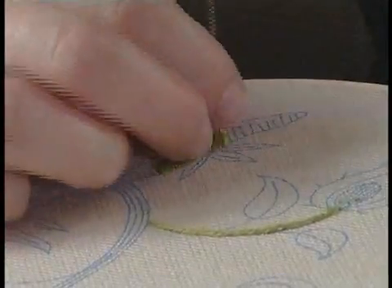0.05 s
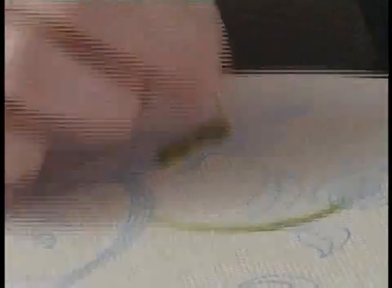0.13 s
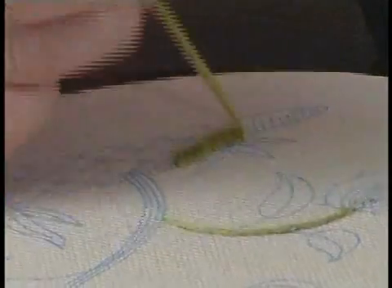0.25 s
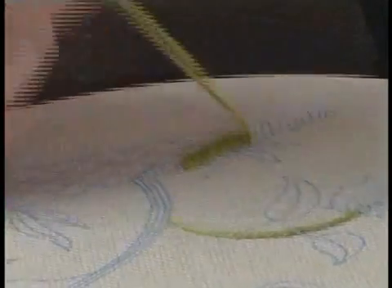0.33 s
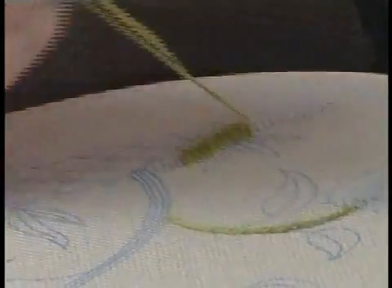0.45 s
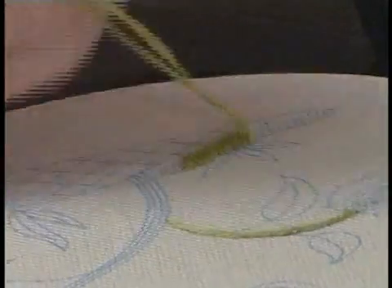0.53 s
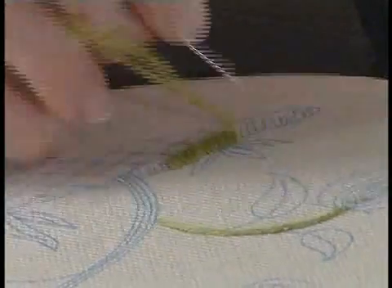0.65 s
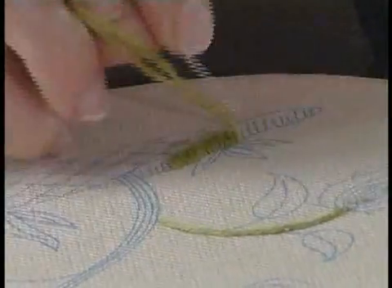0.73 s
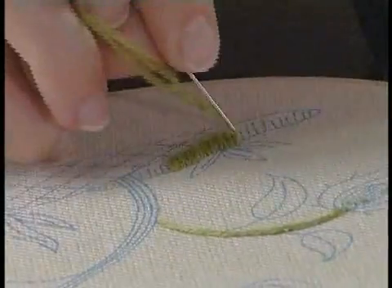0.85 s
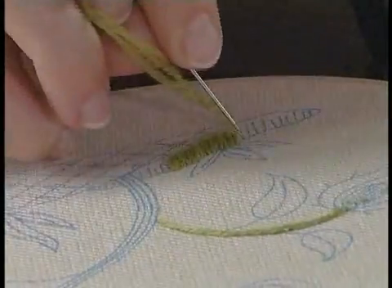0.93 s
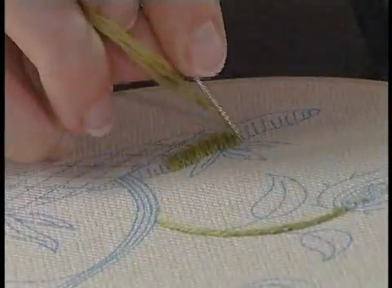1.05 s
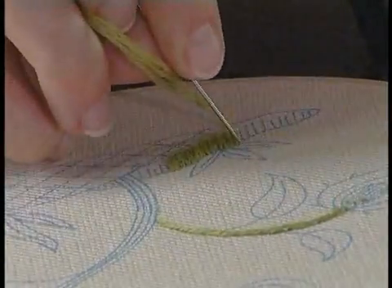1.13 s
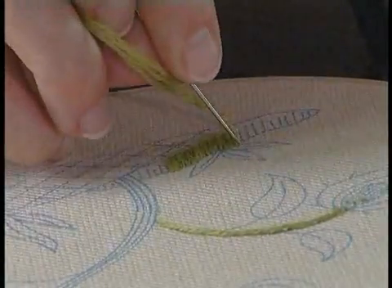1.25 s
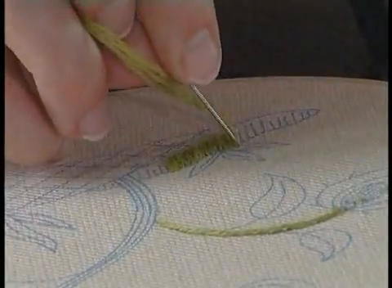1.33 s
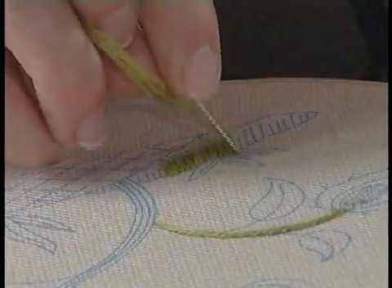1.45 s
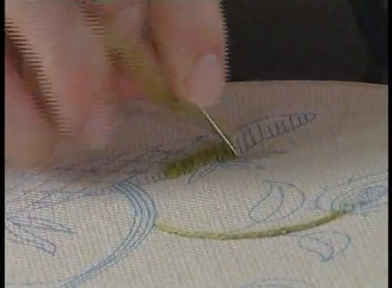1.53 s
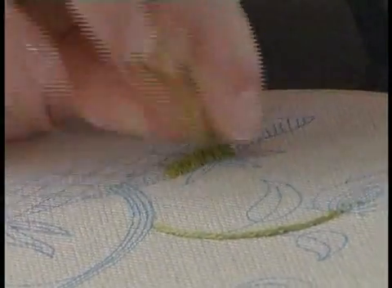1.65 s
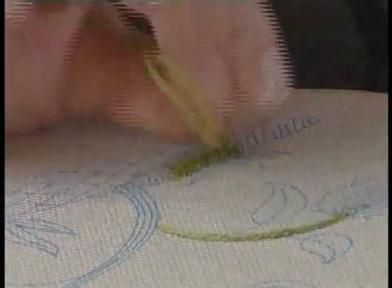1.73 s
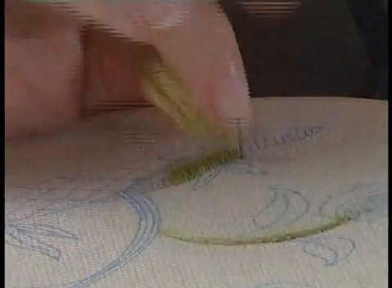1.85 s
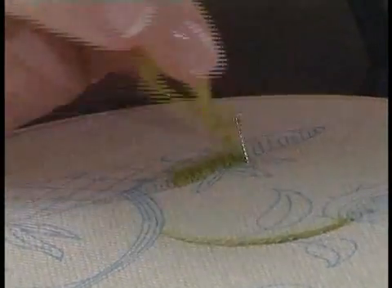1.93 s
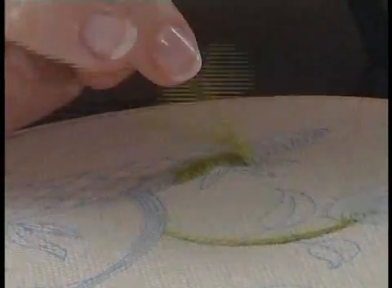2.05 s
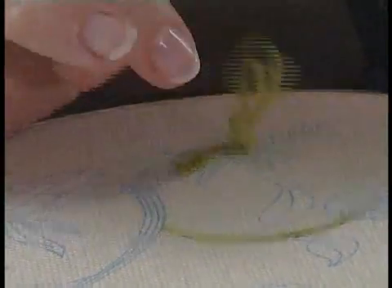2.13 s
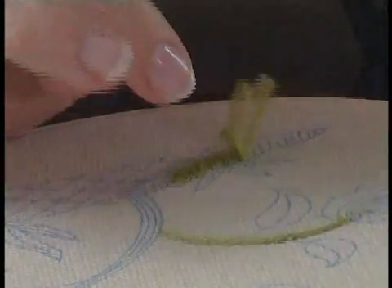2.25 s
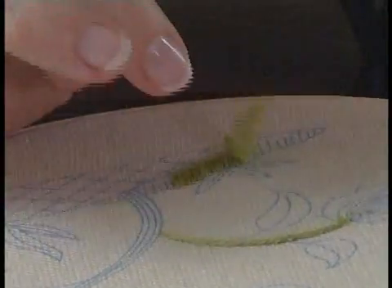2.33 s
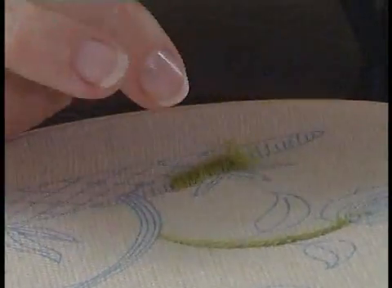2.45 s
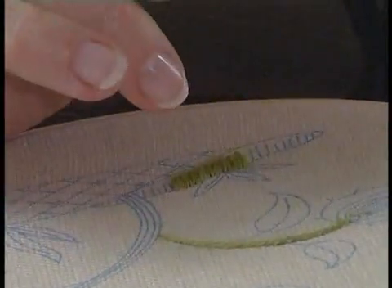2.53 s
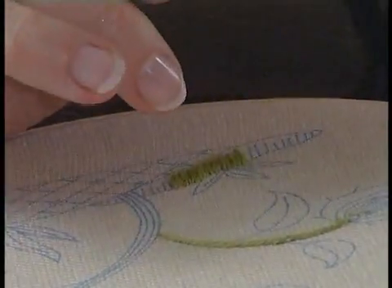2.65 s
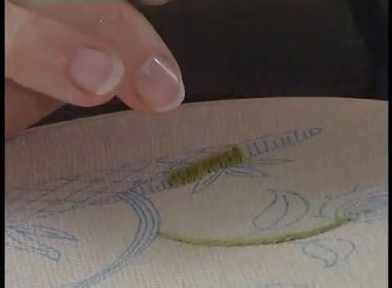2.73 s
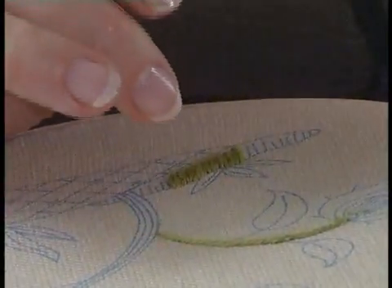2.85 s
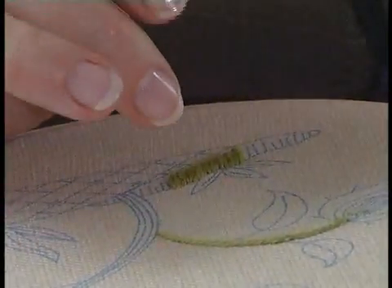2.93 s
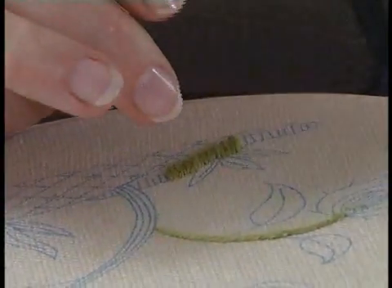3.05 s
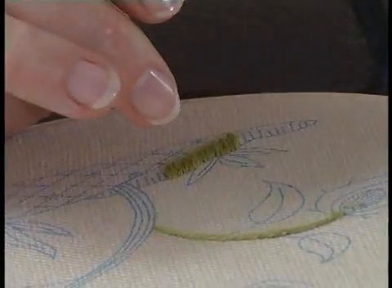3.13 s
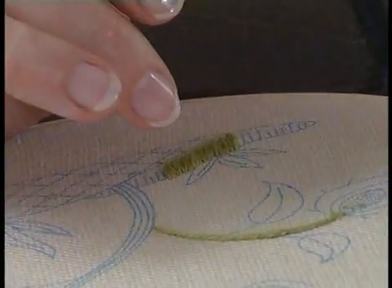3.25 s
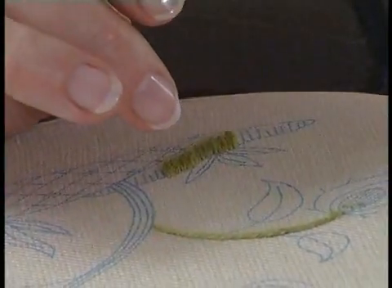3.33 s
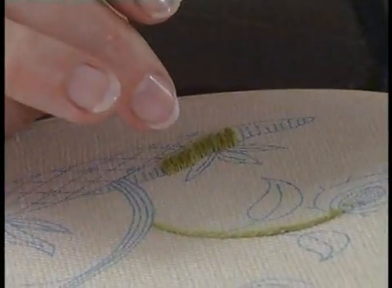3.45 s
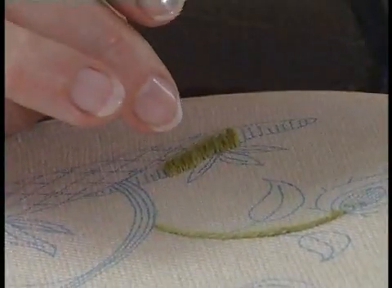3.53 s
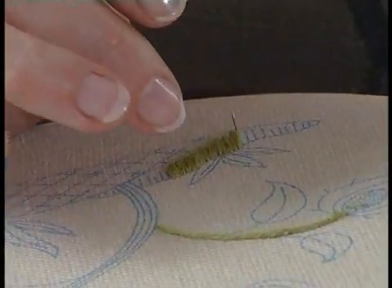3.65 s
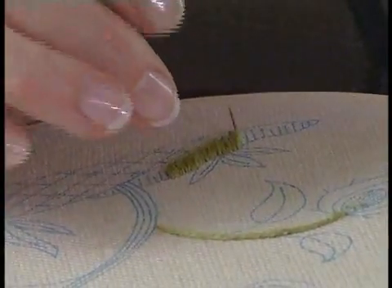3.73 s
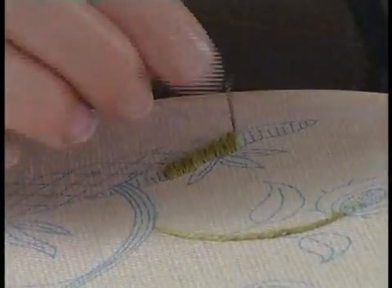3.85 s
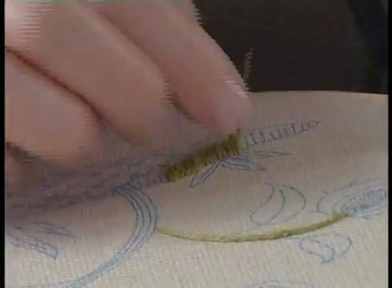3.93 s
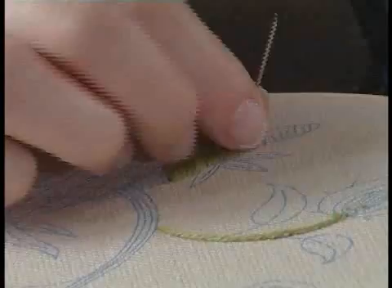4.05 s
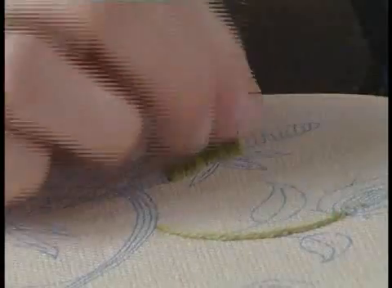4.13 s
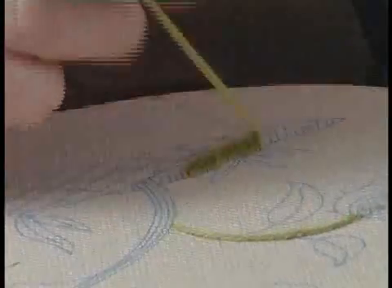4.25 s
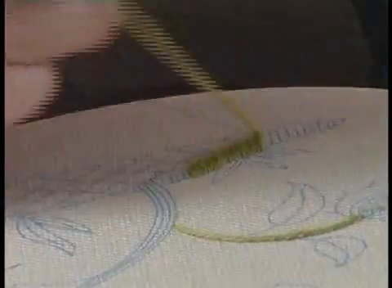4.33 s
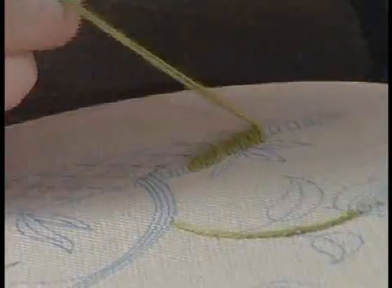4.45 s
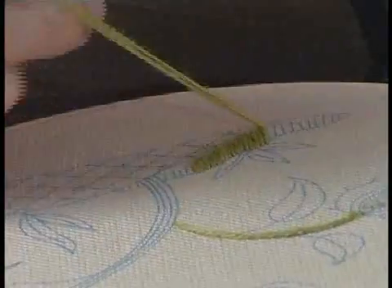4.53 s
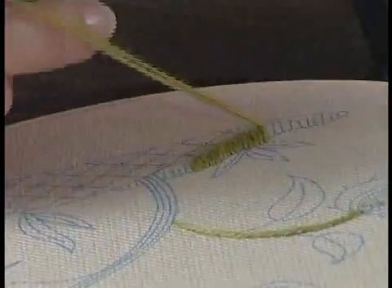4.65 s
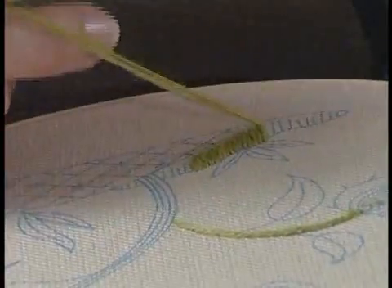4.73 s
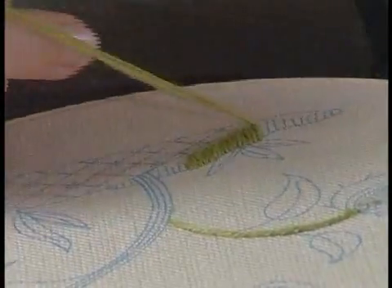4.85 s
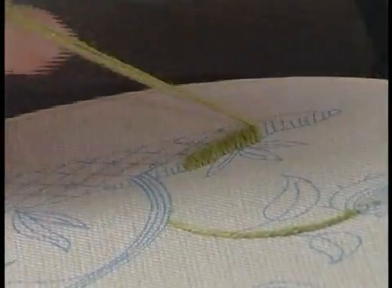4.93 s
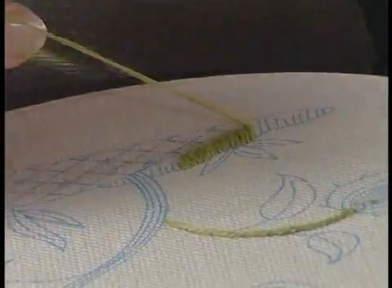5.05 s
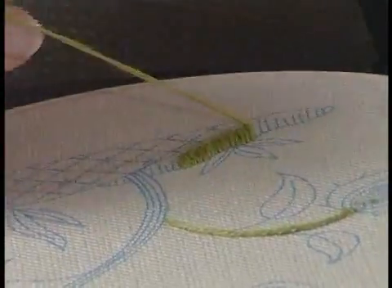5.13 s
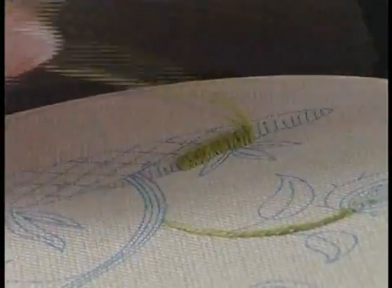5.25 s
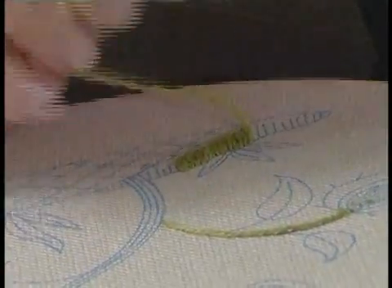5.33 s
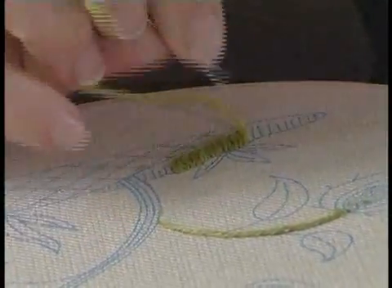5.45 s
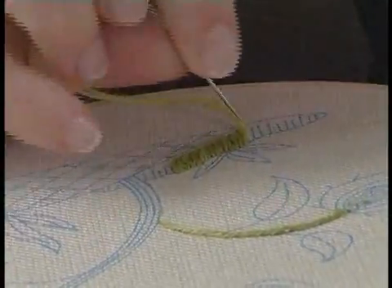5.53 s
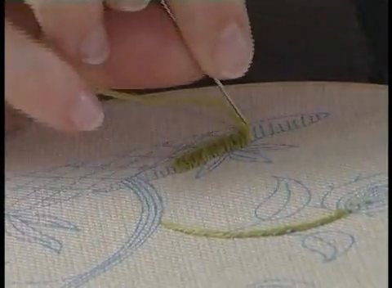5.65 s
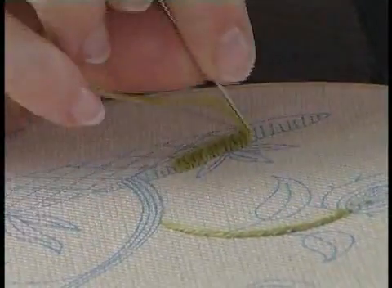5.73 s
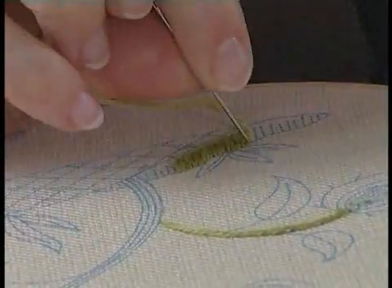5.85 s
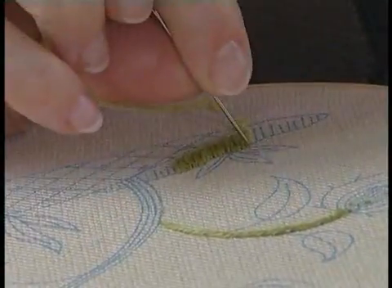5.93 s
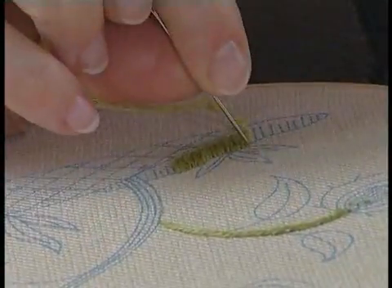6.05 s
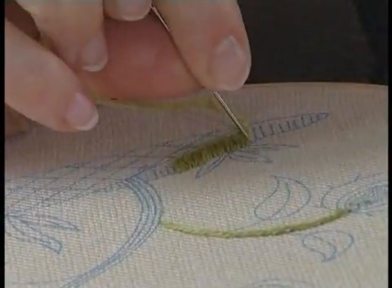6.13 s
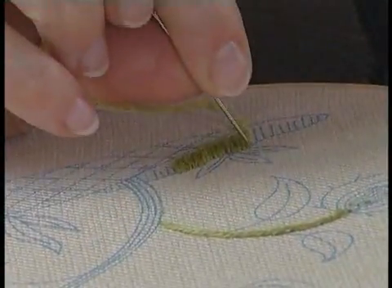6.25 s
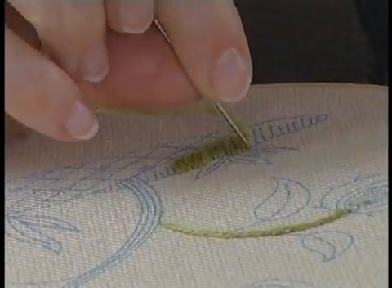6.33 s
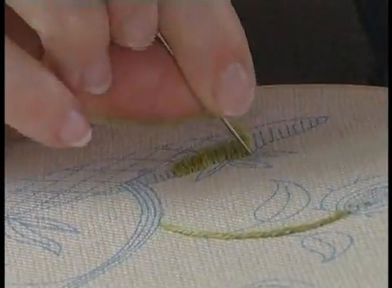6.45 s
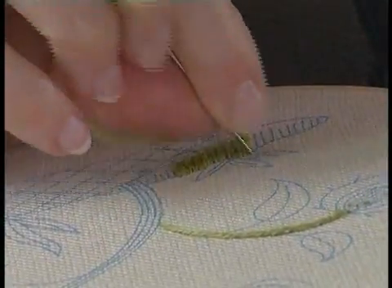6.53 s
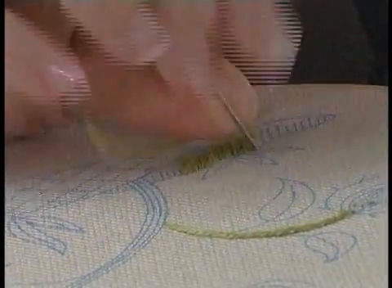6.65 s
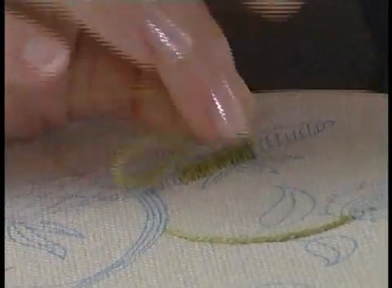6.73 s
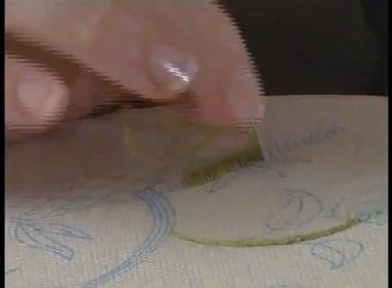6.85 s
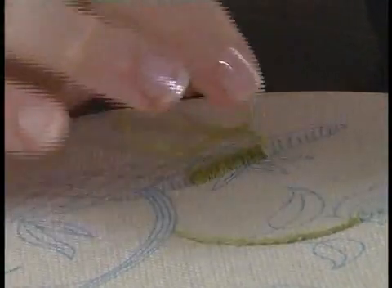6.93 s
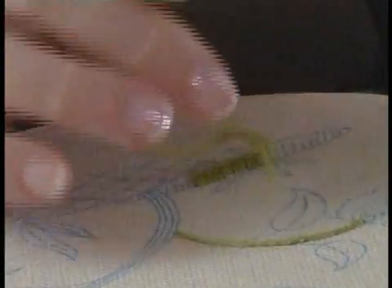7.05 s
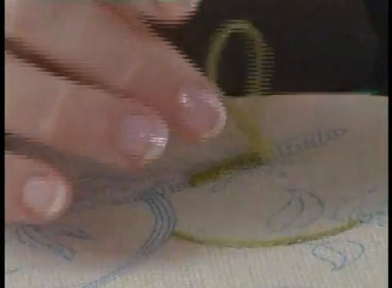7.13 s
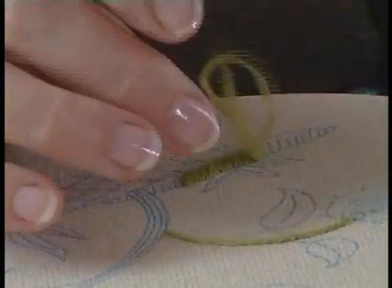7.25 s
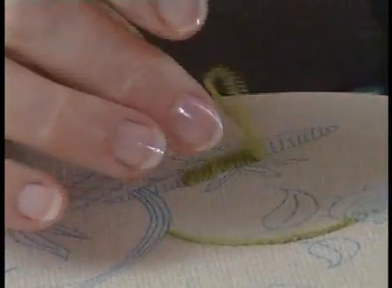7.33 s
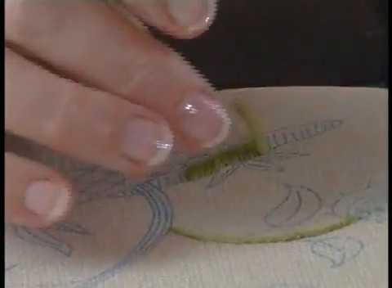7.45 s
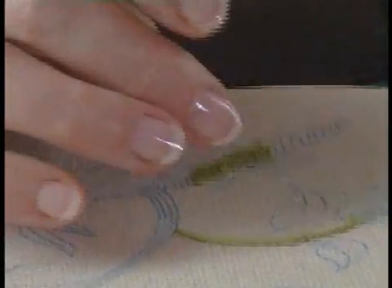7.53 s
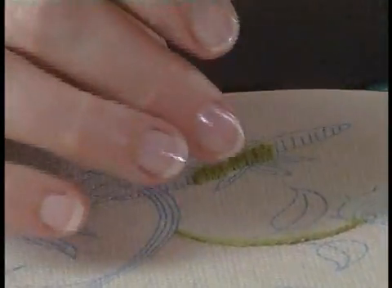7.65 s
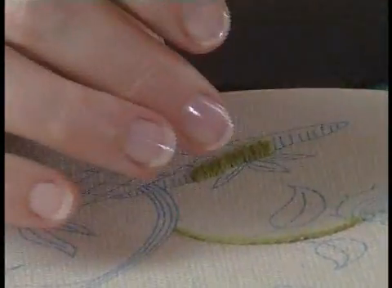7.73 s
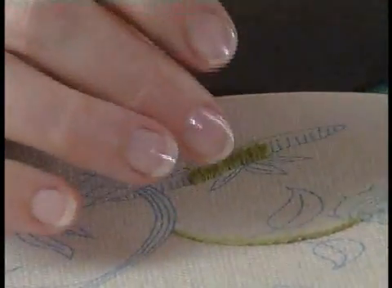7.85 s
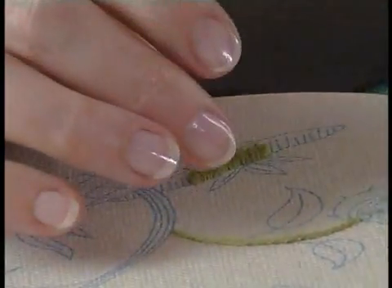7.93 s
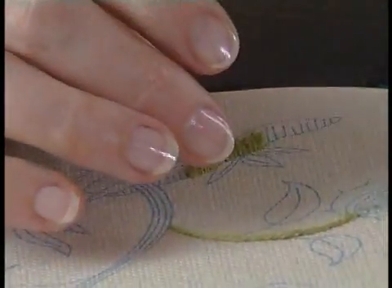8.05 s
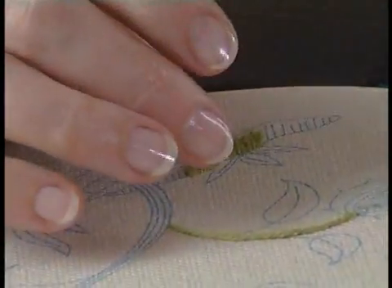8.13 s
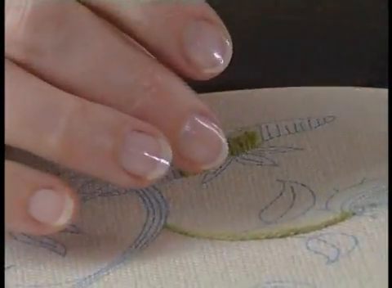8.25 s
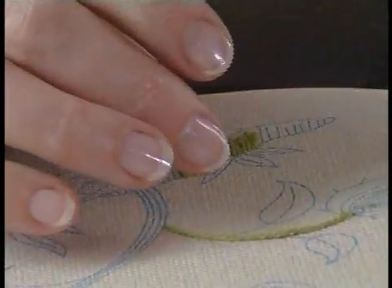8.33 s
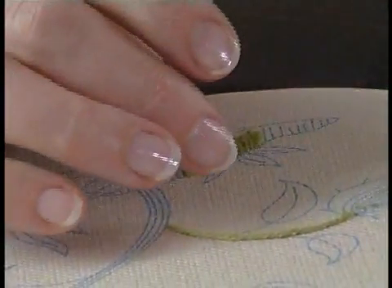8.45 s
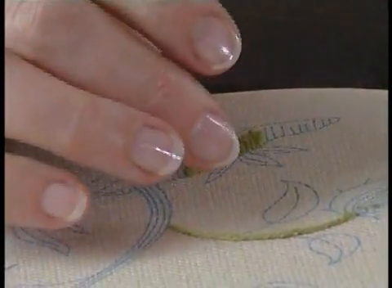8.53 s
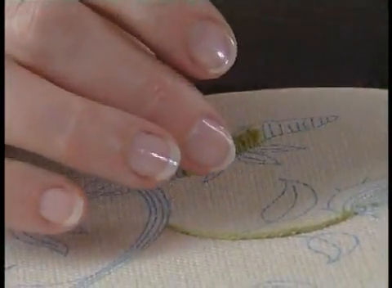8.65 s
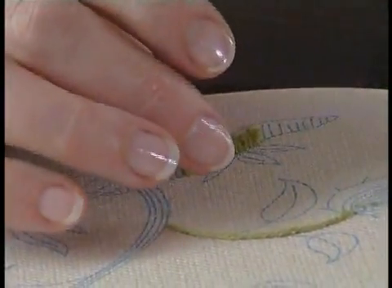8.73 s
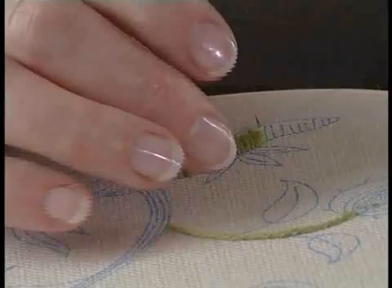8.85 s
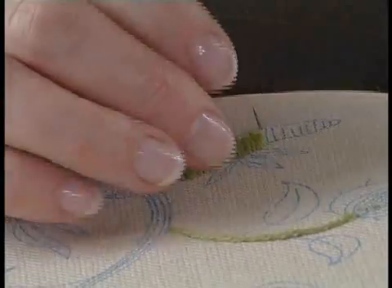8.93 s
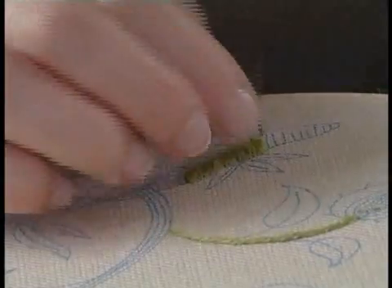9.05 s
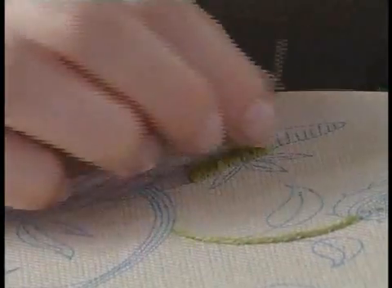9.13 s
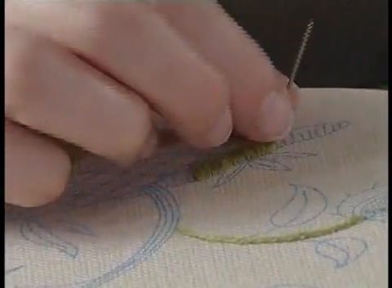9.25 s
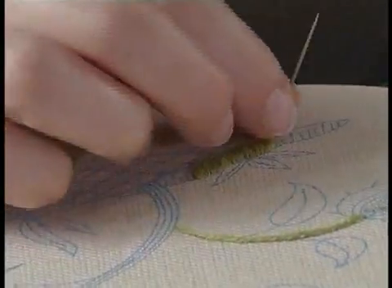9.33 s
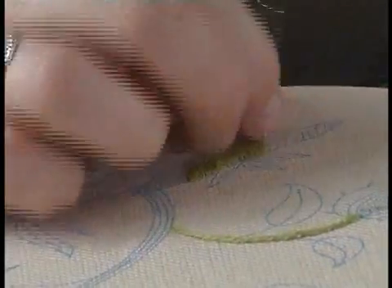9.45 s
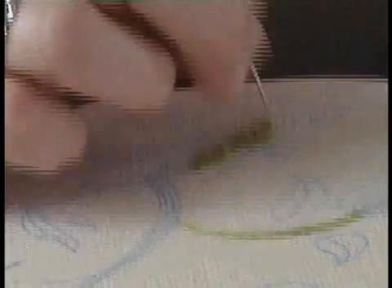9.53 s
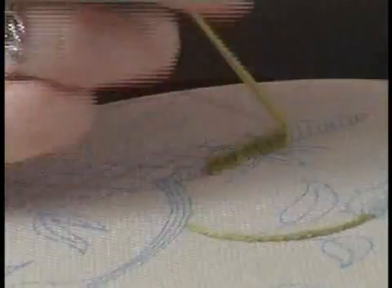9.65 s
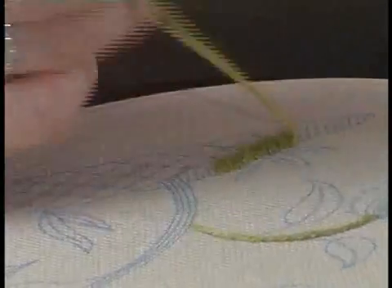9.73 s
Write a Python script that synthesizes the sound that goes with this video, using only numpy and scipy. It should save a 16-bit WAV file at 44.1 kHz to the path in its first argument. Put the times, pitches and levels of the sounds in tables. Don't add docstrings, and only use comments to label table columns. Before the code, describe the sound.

A small, dry, quiet room heard through two close microphones, with steady soft hiss and a low mains hum mostly on the right. At 0.25 s the needle's eye bursts up through taut cloth with the loudest hollow pop and a dull rasp; thread rumbles through until about 0.9 s. After a pause, a bright steel snap at 1.55 s starts light scuffs and pricks. A downward pop at 2.2 s is followed by dragging thread until 2.7 s, then sparse taps. Another upward pop at 4.29 s brings a brighter rasp and pulls, then a fluttering run of tightening jerks at 4.9-5.2 s. Quiet taps lead to finger rubbing at 6.7-7 s, a downward pop at 7.25 s and soft thread drag to 7.8 s. Faint ticks and brushing follow from 8.1 s, until a last upward pop at 9.66 s and short pull.

```python
import sys
import numpy as np
from scipy import signal
from scipy.fft import rfft, irfft, next_fast_len
from scipy.io import wavfile
from scipy.ndimage import map_coordinates

SR = 44100
rng = np.random.default_rng(int(sys.argv[2]) if len(sys.argv) > 2 else 0)


def to_wav(sig):
    pcm = np.clip(np.atleast_2d(sig), -1, 1) * 32767
    pcm = np.round(pcm).astype(np.int16)
    wavfile.write(sys.argv[1], SR, pcm.T)


def ratio_of_db(decibels):
    return 10 ** (np.asarray(decibels, float) / 20)


N = 431738

# (frequency [Hz], density [dB per Hz])
HISS_SPECTRUM = [(130, -24), (220, -6), (330, -1), (420, -4.5), (682, -5.5), (1900, -10.5), (13300, -14),
                 (15100, -20)]
# (frequency [Hz], difference [dB])
HISS_LEAN = [(60, 4), (110, -28), (200, -7), (370, -4.5), (690, -1.5), (1270, -3), (4310, -6),
             (14600, -4.5)]
# (frequency [Hz], density [dB per Hz])
FAR_RUMBLE = [(18, -20), (30, -2), (50, -1), (78, -8), (100, 8.5), (140, -1.5), (230, 2.5), (320, -38)]
# (frequency [Hz], left level [dB], right level [dB])
MAINS_HUM = [(50, -85, -87), (100, -97, -84), (150, -108.5, -63), (448, -94.5, -81.5), (1800, -84, -85.5)]
# (frequency [Hz], T60 [s])
ROOM_T60 = [(150, 0.2), (500, 0.13), (2000, 0.14), (8000, 0.061)]
NOISE_TOP_HZ = 14450

# (frequency [Hz], width [Hz], level [dB])
CLOTH_MODES = [(230.3, 62, -9.5), (315.4, 27, -2.5), (397, 59, -2), (551, 81, -8.5), (697, 29, -6.5),
               (783, 160, -17), (1173, 104, -12.5), (1269, 130, -18), (1540, 270, -18), (1980, 200, -17)]
# (frequency [Hz], width [Hz], level [dB])
HOOP_MODE = (144, 68, -13.5)
# (frequency [Hz], width [Hz], level [dB])
RUBBED_MODE = (383.4, 31, -2.5)
# (frequency [Hz], width [Hz], level [dB])
POINT_MODES = [(625, 183, 1.5), (1453, 142, 7), (2085, 680, -3.5)]
# (frequency [Hz], width [Hz], level [dB])
EYE_MODES = [(630, 100, 4.5), (1220, 400, 1.5), (1890, 590, -2)]
# (frequency [Hz], density [dB per Hz])
RUSTLE_SPECTRUM = [(470, -1), (800, -10), (1190, -6), (3100, -6.5), (5370, -9.5), (12800, -18),
                   (14300, -21), (15100, -51)]

# (start [s], length [s], rumble at start [dB], rumble at end [dB], rustle [dB])
RUBS = [(0.035, 0.017, -88, -76, -66), (0.156, 0.065, -76, -63.5, -72), (1.563, 0.071, -52.5, -72, -74),
        (1.633, 0.059, -58, -60, -68), (1.7, 0.095, -70, -73, -75), (1.806, 0.058, -73.5, -62, -65),
        (1.878, 0.056, -56, -62, -59.5), (1.96, 0.28, -64, -66.5, -69.5), (3.872, .38, -71.5, -75, -70.5),
        (4.269, 0.0093, -54, -54, -73), (4.765, .04, -84, -82, -72), (6.736, .06, -76, -73, -70),
        (6.804, 0.14, -62.5, -67, -62), (6.818, .05, -59, -57, -68), (6.987, 0.3, -65.5, -76.5, -68.5),
        (5.296, 0.38, -81, -82, -86), (8.5, 0.49, -84, -86, -92), (9.008, 0.293, -72.5, -84, -71.5),
        (9.075, 0.075, -73, -70, -73), (9.156, 0.18, -70, -72, -77), (9.576, 0.072, -69, -62, -67)]
# (start [s], length [s], rumble at start [dB], rumble at end [dB], rustle [dB])
PULLS = [(0.299, 0.094, -57, -48, -62), (.405, 0.0091, -67, -48.5, -52), (0.438, 0.058, -58, -59, -64),
         (0.514, .17, -64, -76, -73.5), (0.703, 0.16, -66, -76, -77), (2.25, 0.15, -47.5, -60.5, -67.5),
         (2.404, 0.17, -61.5, -50.5, -62.5), (2.588, 0.073, -62, -71, -84),
         (4.317, 0.12, -49.5, -51, -59.5), (4.463, 0.16, -54, -72, -79), (4.909, 0.209, -58, -56, -69),
         (5.142, .15, -57.5, -75, -83), (7.29, 0.13, -58.5, -56.5, -65), (7.434, 0.19, -59, -68, -65.5),
         (7.604, 0.033, -68, -57, -69), (7.652, 0.14, -67, -81, -79), (9.705, 0.097, -57, -54, -66.5)]
ATTACK_S, RELEASE_S = 0.014, 0.023
RUSTLE_FOLLOWS = 0.65
POP_SHAKE_DB, TAP_SHAKE_DB, SHAKE_RUSTLE_DB = -22, -17, -29
SHAKE_S, SHAKE_FALL_DB = 0.084, 28.5

# (time [s], peak [dB], pitch [Hz], ring [dB], main mode [dB])
POPS_DOWN = [
    (0.2326, -30.5, 417, -8, -18),
    (2.224, -19, 453, 1, 17.5),
    (4.2709, -38.5, 407, -7, 20),
    (7.2461, -20, 397, -4.5, 8),
    (9.628, -35, 423, -9, 5),
]
# (time [s], peak [dB], pitch [Hz], ring [dB], main mode [dB])
POPS_UP = [
    (0.2504, -13.5, 420, -4, 8),
    (4.2872, -17, 427, -5.5, 8.5),
    (9.6624, -16.5, 406, -7, 18),
]
# (time [s], peak [dB], ring [dB])
TAPS = [(1.636, -53, 1), (1.91, -41.5, -22), (1.929, -63, -11), (2.128, -51, 14), (2.734, -61, 13.5),
        (3.073, -55, 11.5), (3.163, -38.5, -2.5), (3.433, -49.5, -26), (3.551, -47.5, -17),
        (4.104, -52.5, -8), (4.204, -52.5, -11), (4.75, -56, 5), (5.449, -51.5, 0), (6.197, -59.5, 10),
        (6.396, -51, -11), (6.678, -41, -14), (6.898, -49, -4), (6.926, -44, -6), (7.043, -58.5, 14),
        (8.086, -46.5, -6), (8.125, -50, -12), (8.251, -55, -15), (8.772, -55.5, -5)]
# (time [s], peak [dB], ring [dB])
SNAGS = [(0.412, -57, -9), (0.558, -50, -15), (0.66, -52.5, -2), (0.701, -50, -2), (0.759, -58, 7),
         (2.274, -53, -4), (2.462, -53, 6), (2.503, -64, 4), (2.548, -53, 10), (4.408, -38.5, -5),
         (7.432, -54, 6), (7.61, -58, 4), (7.767, -61, 8)]
# (time [s], peak [dB], ring [dB])
TUGS = [
    (4.902, -41, 0),
    (4.912, -57, 7),
    (4.953, -43, -4),
    (4.979, -36.5, -12),
    (5.002, -44, -1),
    (5.014, -42.5, 4),
    (5.046, -43, -5),
    (5.079, -46, -3),
    (5.155, -43, -15),
    (5.174, -45, -13),
]
THUMP_HZ = 470
PAN_DB, PAN_PER_RING_DB = 8.5, 0.6

# (time [s], peak [dB], upper resonance [Hz], upper level [dB], air [dB])
RASPS = [
    (0.2488, -24.5, 3230, -9.5, -22),
    (4.3067, -25, 3150, -0.5, -16.5),
]
# (time [s], peak [dB], upper resonance [Hz], upper level [dB], air [dB])
SNAPS = [
    (0.459, -32.5, 3280, -11, -28),
    (1.5531, -30.5, 3200, -3.5, -14),
    (1.6608, -40, 3420, -12, -32),
    (1.8801, -34.5, 3480, -10, -32),
    (4.4724, -36, 3300, -10, -33),
    (8.4633, -47.5, 2270, 1.5, 2.5),
    (8.7715, -53, 2270, 5, -8),
    (9.637, -29.5, 3440, -8, -12.5),
]
# (time [s], peak [dB], air [dB])
PRICKS = [(0.407, -47, -5), (0.4164, -42, -22), (1.872, -45, -22), (1.9101, -45, -4), (2.139, -54, -17),
          (3.0734, -54, -17), (3.1642, -50.5, 1), (3.5524, -63, -11), (4.9545, -43.5, -24),
          (6.6792, -47, -15), (6.9252, -42.5, -22), (7.4804, -54, 10), (8.1269, -56, -9)]
# (time [s], peak [dB], upper resonance [Hz], upper level [dB], air [dB])
TEARS = [
    (2.2214, -24.5, 3940, -10.5, -15),
    (4.2857, -32, 3300, -10, -13),
    (7.2464, -33.5, 4330, -6.5, -11.5),
    (9.6614, -31.5, 3340, -15, -28),
]
PRICK_HZ, PRICK_UPPER_DB = 3630, 0
TUG_TICK_DB, TUG_TICK_LATE_S, TUG_TICK_AIR_DB = -12, 0.00121, -3.5
SCRAPE_SHARE, SCRAPE_T60_S = 0.22, 0.007
RASP_SHARE, RASP_T60_S = 0.7, 0.02
SPOT_SCATTER_DB = 1


def unit(x):
    return x / np.sqrt(np.mean(x ** 2) + 1e-20)


def along(points, hz):
    f, value = np.transpose(points)
    return np.interp(np.log(hz + 1), np.log(f + 1), value)


def filtered(x, response):
    n = x.shape[-1]
    size = next_fast_len(n + 2048, True)
    spectrum = rfft(x, size) * response(np.fft.rfftfreq(size, 1 / SR))
    return irfft(spectrum, size)[..., :n]


def modes(table, f):
    total = 0
    for k, (centre, width, db) in enumerate(table):
        loss = 1j * f * width
        total = total + (-1) ** k * ratio_of_db(db) * loss / (centre * centre - f * f + loss)
    return total


def wobble(rate):
    knots = rng.standard_normal(int(N * rate / SR) + 4)
    return map_coordinates(knots, [np.arange(N) * rate / SR])


def rustling(x):
    return unit(filtered(x, lambda f: ratio_of_db(along(RUSTLE_SPECTRUM, f)) * (f < NOISE_TOP_HZ)))


def walls(x, wet_db, gap):
    noise = rng.standard_normal((2, min(len(x), SR // 3)))
    hz, t, z = signal.stft(noise, SR, nperseg=128)
    decay = ratio_of_db(-60 * t / along(ROOM_T60, hz)[:, None])
    tail = signal.istft(z * decay, SR, nperseg=128)[1]
    tail = np.pad(tail / np.linalg.norm(tail[0]), ((0, 0), (round(gap * SR), 0)))
    return ratio_of_db(wet_db) * signal.oaconvolve(x[None], tail, axes=1)[:, :len(x)]


def add(out, s, sound):
    part = out[:, round(s * SR):][:, :sound.shape[1]]
    part += sound[:, :part.shape[1]]


def floor():
    def hiss_response(f):
        lean_db = along(HISS_LEAN, f) * np.array([[0.5], [-0.5]])
        return ratio_of_db(along(HISS_SPECTRUM, f) + lean_db) * (f < NOISE_TOP_HZ)

    hiss = ratio_of_db(-65.0) * unit(filtered(rng.standard_normal((2, N)), hiss_response))
    far = rng.standard_normal((2, N)) + 0.6 * rng.standard_normal(N)
    far = ratio_of_db(-78.0) * unit(filtered(far, lambda f: ratio_of_db(along(FAR_RUMBLE, f))))
    turn = 2 * np.pi * np.arange(N) / SR
    hum = np.zeros((2, N))
    for hz, left_db, right_db in MAINS_HUM:
        gain = ratio_of_db(np.array([[left_db], [right_db]]) + 2 + 1.1 * wobble(7.8))
        hum += gain * np.sin(hz * turn + 0.09 * wobble(1.6))
    return hiss + far + hum


def strokes():
    blows = [(s, db + POP_SHAKE_DB) for s, db, *_ in POPS_UP + POPS_DOWN]
    blows += [(s, db + TAP_SHAKE_DB) for s, db, _ in TAPS]
    shakes = [(s + ATTACK_S, SHAKE_S, db, db - SHAKE_FALL_DB, db + SHAKE_RUSTLE_DB) for s, db in blows]
    gain = np.zeros((2, N))
    for s, length, first_db, last_db, rustle_db in PULLS + RUBS + shakes:
        t = np.arange(round((ATTACK_S + length + RELEASE_S) * SR)) / SR
        edge = np.clip(np.minimum(t / ATTACK_S, (t[-1] - t) / RELEASE_S), 0, 1) ** 2
        rumble_db = np.interp(t, [ATTACK_S, ATTACK_S + length], [first_db, last_db])
        rustle_db = rustle_db + RUSTLE_FOLLOWS * (rumble_db - rumble_db.mean())
        add(gain, s - ATTACK_S, edge * ratio_of_db(np.array([rumble_db, rustle_db]) + 1.0))
    return gain


def slips(per_second, swing_db, rate):
    hits = rng.random((2, N)) < per_second / SR
    return hits * rng.standard_normal((2, N)) * ratio_of_db(swing_db * wobble(rate))


def drag():
    def drum(f):
        skin = modes([HOOP_MODE] + CLOTH_MODES, f) + modes([RUBBED_MODE], f)
        return skin * 1j * f / (130 + 1j * f) / (1 + 1j * f / 520)

    rumble_gain, rustle_gain = strokes()
    jerks = slips(1200, swing_db=2, rate=60)
    jerks[1] += 0.5 * jerks[0]
    rumble = unit(filtered(jerks, drum)) * ratio_of_db([[-1.5], [1.5]])
    rustle = rustling(slips(5000, swing_db=2.5, rate=120))
    direct = rumble_gain * rumble + rustle_gain * rustle
    return direct + walls(direct[0], wet_db=-6.5, gap=0.003)


def thump(hz, ring_db, main_db, pan_db, size):
    u = (np.arange(size) / SR - 0.004) * hz
    bell = np.exp(-(u / 0.43) ** 2)
    swing = -np.cos(2 * np.pi * u + 0.5)
    push = (swing - np.sum(swing * bell) / np.sum(bell)) * bell
    snap = np.gradient(np.exp(-(u / 0.097) ** 2)) * 12
    ring = []
    for side_db in (2, 7):
        skin = [(c, w, db + main_db * (270 < c < 350) + rng.normal(0, 0.73)) for c, w, db in CLOTH_MODES]
        ring.append(ratio_of_db(ring_db + side_db) * filtered(push + snap, lambda f: modes(skin, f)))
    lean_db = 2.5 + pan_db / 2
    direct = push * ratio_of_db([[lean_db], [-lean_db]])
    dull = filtered(push + ring[0], lambda f: 1 / (1 + 1j * f / 600))
    return direct + np.array(ring) + walls(dull, wet_db=-2.5, gap=0.00504)


def thumps():
    out = np.zeros((2, N))
    for pops, way in ((POPS_UP, 1), (POPS_DOWN, -1)):
        for s, db, hz, ring_db, main_db in pops:
            add(out, s - 0.004, way * ratio_of_db(db) * thump(hz, ring_db, main_db, 0, size=SR // 3))
    for s, db, ring_db in TAPS + SNAGS + TUGS:
        pan_db = PAN_DB + PAN_PER_RING_DB * ring_db
        add(out, s - 0.001, ratio_of_db(db) * thump(THUMP_HZ, ring_db, 0, pan_db, size=SR // 8))
    return filtered(out, lambda f: 1j * f / (150 + 1j * f))


def fuzz():
    out, t = np.zeros((2, N)), np.arange(SR // 5) / SR
    for s, db, *_ in POPS_UP + POPS_DOWN:
        hiss = rustling(rng.standard_normal((2, len(t))))
        add(out, s, ratio_of_db(db - 32 - 60 * t / 0.11) * hiss)
    return out


def tick(upper_hz, upper_db, air_db, body, share, t60):
    t = np.arange(SR // 7) / SR
    spot = [(c, w, db + rng.normal(0, SPOT_SCATTER_DB)) for c, w, db in body]
    spot += [(upper_hz, 700, upper_db + 6.0), (8000, 8000, air_db - 1)]
    scrape = share * ratio_of_db(-60 * t / t60) * rng.standard_normal(len(t))
    click = ratio_of_db(-60 * t / 0.001) + scrape
    click = filtered(click, lambda f: modes(spot, f) / (1 + 1j * f / 12000))
    click /= np.abs(click).max()
    direct = np.array([ratio_of_db(7) * click, ratio_of_db(1) * np.roll(click, round(0.00054 * SR))])
    lap = ratio_of_db([[-9], [-3]]) * np.array([np.roll(click, round(s * SR)) for s in (0.0019, 0.0023)])
    room = ratio_of_db([[-2], [2]]) * walls(click, wet_db=-7, gap=0.003)
    return direct + lap + room


def ticks():
    light = PRICKS + [(s + TUG_TICK_LATE_S, db + TUG_TICK_DB, TUG_TICK_AIR_DB) for s, db, _ in TUGS]
    light = [(s, db, PRICK_HZ, air_db + PRICK_UPPER_DB, air_db) for s, db, air_db in light]
    kinds = [(SNAPS + light, POINT_MODES, SCRAPE_SHARE, SCRAPE_T60_S),
             (TEARS, EYE_MODES, SCRAPE_SHARE, SCRAPE_T60_S),
             (RASPS, POINT_MODES, RASP_SHARE, RASP_T60_S)]
    out = np.zeros((2, N))
    for events, body, share, t60 in kinds:
        for s, db, upper_hz, upper_db, air_db in events:
            add(out, s + 0.00023, ratio_of_db(db) * tick(upper_hz, upper_db, air_db, body, share, t60))
    return out


def scene():
    return floor() + drag() + thumps() + fuzz() + ticks()


def roll_off(x):
    return signal.sosfilt(signal.butter(12, 15210, fs=SR, output="sos"), x)


def record(dry):
    return roll_off(dry)


dry = scene()
out = record(dry)
to_wav(out)
```